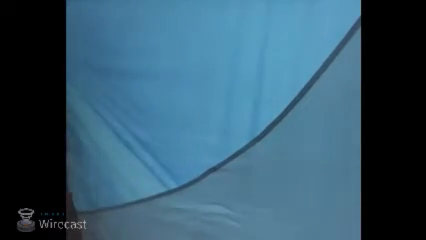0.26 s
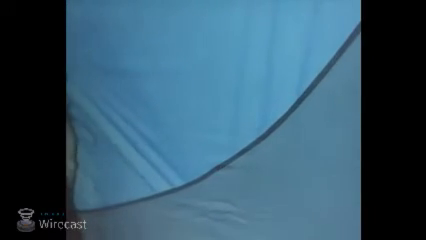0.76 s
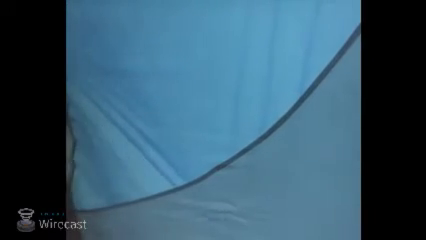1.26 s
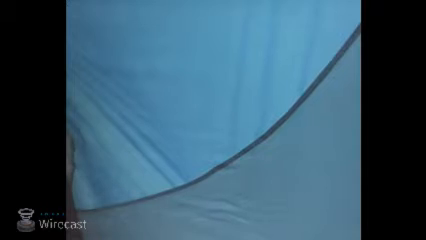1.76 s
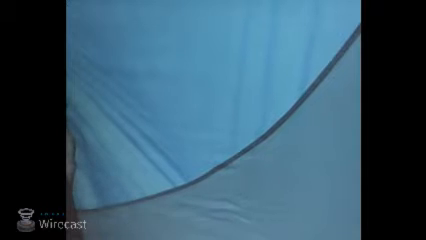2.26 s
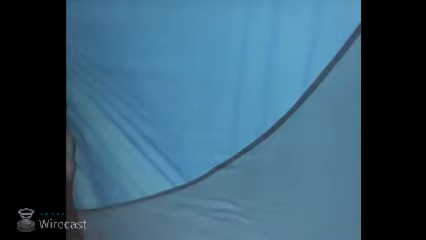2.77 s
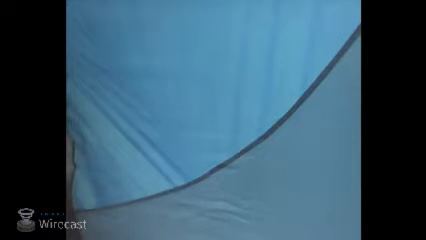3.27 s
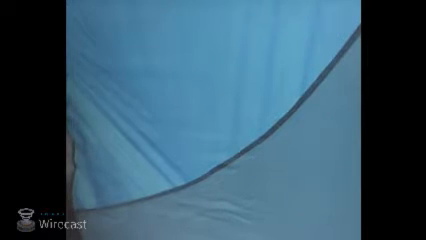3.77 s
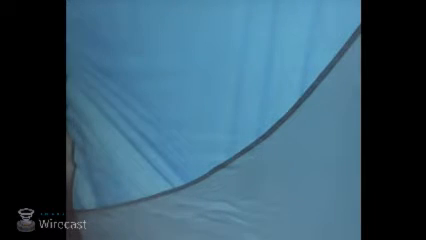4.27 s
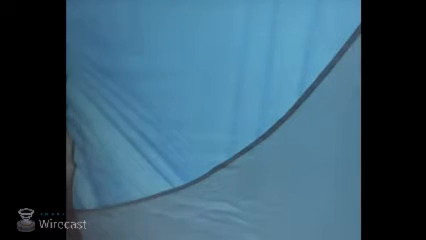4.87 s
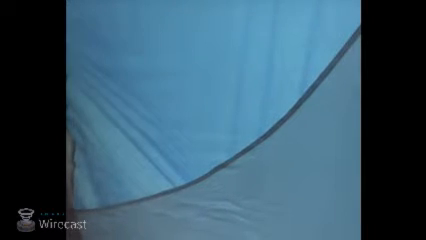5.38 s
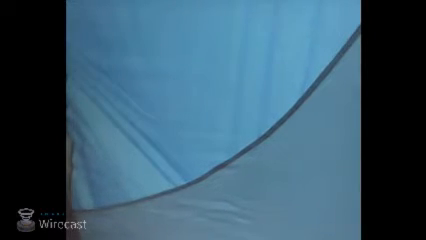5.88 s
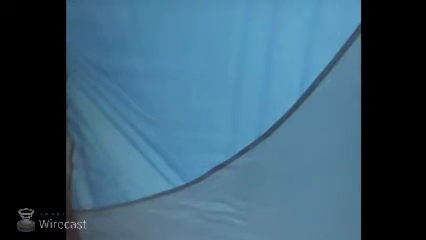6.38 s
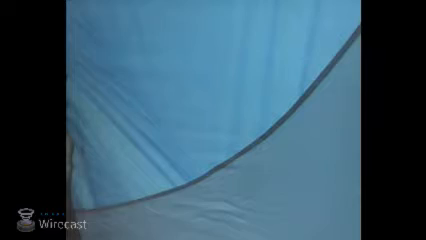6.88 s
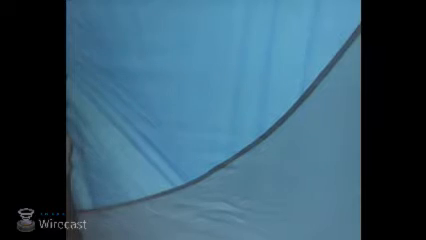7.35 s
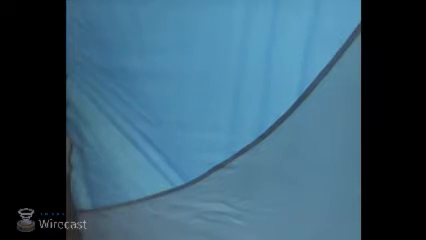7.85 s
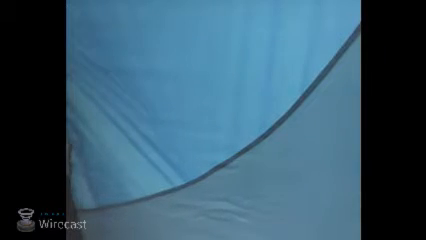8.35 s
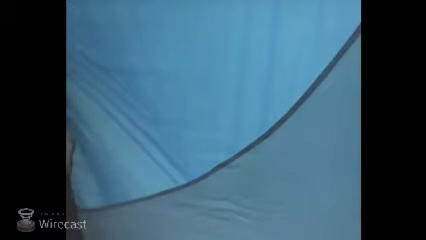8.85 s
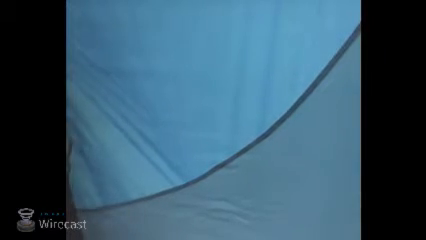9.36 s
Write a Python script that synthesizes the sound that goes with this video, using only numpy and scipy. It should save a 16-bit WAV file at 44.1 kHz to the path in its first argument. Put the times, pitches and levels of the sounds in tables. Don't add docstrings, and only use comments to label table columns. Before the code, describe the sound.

A steady far insect chorus is joined by one close, rapidly throbbing cicada, while cloth rustles and fingers tick and knock near the microphone.

```python
import sys
import numpy as np
from scipy import signal
from scipy.fft import rfft, irfft, next_fast_len
from scipy.io import wavfile
from scipy.ndimage import uniform_filter1d

SR = 44100
rng = np.random.default_rng(int(sys.argv[2]) if len(sys.argv) > 2 else 0)


def transcribe(signal):
    frames = np.atleast_2d(signal).T
    limited = np.clip(frames, -1, 1)
    pcm = np.round(limited * 32767).astype(np.int16)
    wavfile.write(sys.argv[1], SR, pcm)


def to_linear_factor(level_db):
    exponent = np.asarray(level_db, float) / 20
    return 10 ** exponent


N = 424241
TIME = np.arange(N) / SR

# t/s, clicks per s, slack note f/Hz, lowest rib f/Hz, highest rib f/Hz
WIND_UP = [(.8, 340, 5300, 10300, 10700), (1.6, 345, 5550, 10900, 11400), (2.3, 352, 5800, 11600, 12500),
           (3.4, 359, 5830, 11500, 12600), (4.1, 364, 5850, 11600, 12900), (4.35, 367, 5860, 11900, 13600),
           (4.8, 375, 5880, 13000, 13900), (5.4, 381, 5950, 13100, 14250), (6.5, 386, 6000, 13300, 14800),
           (8.0, 391, 6000, 13500, 15200), (9.7, 394, 6000, 13400, 15400)]
# t/s, slack note level/dB, its octave level/dB, taut note level below the ribs/dB
EFFORT = [
    (.6, -63, -68, -9),
    (1.5, -77, -66, -11),
    (2.3, -51, -59.5, -34),
    (3.9, -46, -54.5, -16),
    (5.3, -43.5, -51.5, -7),
    (6.5, -43.5, -50, -6.5),
    (8.0, -42.5, -51, -8),
    (9.7, -42, -53, -7),
]


def soloist():
    per_s, slack_hz, low_rib_hz, high_rib_hz = curves(WIND_UP)
    slack_db, octave_db, taut_db = curves(EFFORT)
    high_db, depth_db, slump = belly_pumps()
    swing = np.clip(depth_db / 14.2, .1, 1) * slump
    spread_hz = high_rib_hz - low_rib_hz
    ribs_hz = [low_rib_hz + k * spread_hz + 420 * swing for k in (0, .5, 1)]
    drum = buckles(per_s, weak_db=-4, rough=.8, burst_s=.003)
    fade = np.clip((TIME - .9) / 1.05, 0, 1)

    slack = evened(resonate(drum, slack_hz, 340)) * to_linear_factor(slack_db - 3.7 * swing - 6.5)

    octave = resonate(drum, 1.837 * slack_hz, 1400) - resonate(drum, 2.03 * slack_hz, 1300)
    octave = evened(octave) * to_linear_factor(octave_db - 0.7 * swing)

    taut = evened(resonate(drum, .51 * ribs_hz[2], 900)) * to_linear_factor(8.0 * swing)
    taut *= to_linear_factor(high_db + taut_db - 2.0) * fade

    rib_tilt_db = -0.5
    ribs = sum((-to_linear_factor(rib_tilt_db)) ** k * resonate(drum, hz, 900) for k, hz in enumerate(ribs_hz))
    ribs /= np.sqrt(uniform_filter1d(ribs ** 2, size=SR // 4))
    high = ribs * to_linear_factor(high_db + 1.5 + 0.84 * depth_db * slump) * fade

    air_sac = evened(resonate(drum, .155 * low_rib_hz, 110)) * to_linear_factor(slack_db - 39.5)
    song = slack + octave + taut + high + air_sac
    return np.std(song) * trees(song, t60=0.053, wet_db=-4)


# t/s, pumps ahead of the steady rate
LEAD = [(2.1, -1.27), (2.41, -.95), (2.73, -.36), (3.25, .1), (4.0, -.53), (4.62, -.3), (4.95, -.12),
        (5.28, .15), (5.5, .24), (5.68, .54), (5.9, .63), (6.08, .92), (6.5, 1.1), (6.88, 1.11),
        (7.37, 1.3), (8.45, .81), (8.8, .74), (9.62, .15)]
# t/s, taut ribs level/dB, dip between pumps/dB
RIBS = [
    (1.9, -60, 0.5),
    (2.4, -51, 16),
    (3.3, -54.5, 9.5),
    (4.2, -47.5, 14),
    (5.0, -45, 9),
    (6.2, -43.5, 6),
    (7.6, -41.5, 7),
    (9.62, -41.5, 6),
]
# middle t/s, length/s, share of the dip lost
FALTERS = [(2.2, .2, .6), (2.603, 0.16, 0.46), (3.027, .2, 0.47), (3.358, 0.16, 0.28), (4.1, 0.23, 0.58),
           (4.69, 0.35, .7), (5.137, 0.22, .5), (5.563, .22, 0.92), (5.957, 0.29, 0.88), (6.32, 0.18, .4),
           (6.8, 0.36, .75), (7.24, 0.32, .6), (7.937, .3, .55), (8.573, 0.36, .7), (9.14, .25, .55)]


def belly_pumps():
    pumps_per_s = 17
    ribs_db, dip_db = curves(RIBS)
    falter = np.clip(swells(*np.transpose(FALTERS)), 0, 1)
    high_db = ribs_db - 3.5 * falter + .6 * drift(pumps_per_s)
    depth_db = dip_db * (1 - falter)
    pump = pumps_per_s * TIME + curves(LEAD)[0]
    beat = 2 * np.pi * (pump - .04)
    beat = beat + 0.38 * (1 - np.cos(beat))
    slump = np.tanh(1.35 * np.cos(beat)) / np.tanh(1.2) - 1
    return high_db, depth_db, slump


# t/s, level/dB
CHORUS = [
    (0.0, -46.5),
    (1.1, -46.5),
    (2.3, -45.5),
    (2.6, -44.5),
    (4.9, -45),
    (5.7, -44.5),
    (7.2, -43.5),
    (9.62, -45),
]
# f/Hz, level/dB per Hz
SHRILL = [(2500, -42.5), (3600, -23.5), (4050, -11), (4500, -2.5), (4900, 1), (5600, 1), (6200, -1),
          (7000, -9), (8200, -13), (9300, -16.5), (10500, -12), (11500, -11.5), (12800, -12.5),
          (15900, -12.5)]
# t/s, rise over the chorus/dB
THROBS = [(.85, 0.5), (1.55, 0.5), (2.12, 0.4), (2.44, 0), (3.1, 0.2), (3.62, 0.5), (4.15, 0), (4.77, 1),
          (5.04, 0), (5.27, 2), (5.77, 1), (6.26, 0.5), (6.82, 0.5), (7.35, 0), (7.9, 1.5), (8.42, 1),
          (8.97, 1), (9.53, 1)]
# f/Hz, level/dB per Hz
CALLER = [(4000, -30), (4900, 1), (5600, -1), (6200, -3.5), (8000, -44), (9900, -19), (10600, -8),
          (11600, -9.5), (12800, -30)]


def chorus(count=7):
    near = np.zeros(N)
    for u, v, w, p in rng.random((count, 4)):
        wander = np.sin(2 * np.pi * (.4 * TIME + u))
        swell_db = 7.0 * np.sin(2 * np.pi * ((4 + 12 * w) * TIME + p + 0.55 * wander))
        per_s = (160 + 230 * v) * (1 + .03 * wander)
        near += buckles(per_s, weak_db=-3.5, rough=0.91, burst_s=0.0014) * to_linear_factor(swell_db)
    mass = 0.65 * trees(near, t60=0.096, wet_db=-4.5) + 0.69 * patchy(patch_db=0.04, size=512)
    s, rise_db = np.transpose(THROBS)
    throb = swells(s, 0.092, rise_db)
    caller = colour(near, CALLER, 4470, 7200) * to_linear_factor(-4.5) * np.sqrt(abs(throb))
    swell = to_linear_factor(0.53 * throb - 0.1 * drift(17))
    level = to_linear_factor(curves(CHORUS)[0] - 1.35)
    return level * (caller + colour(mass, SHRILL, 4526, 5470) * swell)


def buckles(per_s, weak_db, rough, burst_s):
    turns = np.cumsum(per_s * np.ones(N)) / SR + rng.random()
    snap = np.diff(np.floor(turns), prepend=0) > 0
    crackle = np.exp(-(turns % 1) / (per_s * burst_s)) * rng.standard_normal(N)
    side = np.where(turns % 2 < 1, 1, to_linear_factor(weak_db))
    return evened(side * ((1 - rough) * evened(snap - snap.mean()) + rough * evened(crackle)))


def trees(x, t60, wet_db):
    t = TIME[:SR // 8]
    tails = rng.standard_normal((3, SR // 8)) * to_linear_factor(-60 * t / t60)
    tails = tails * (t > .004)
    turns = np.cos(2 * np.pi * (3.1 * TIME + np.arange(3)[:, None] / 3))
    echoes = signal.oaconvolve(x * turns, tails, axes=1)[:, :N].sum(0)
    return evened(evened(x) + to_linear_factor(wet_db) * evened(echoes))


# middle t/s, length/s, peak level/dB
RUBS = [
    (0.0, 0.67, -61.5),
    (.47, 0.76, -67),
]
# t/s, peak level/dB, f/Hz, cycles
BUMPS = [
    (0.004, -48, 75.4, 2.3),
    (0.027, -41.5, 78.1, 1.1),
    (0.363, -54, 93, 3.6),
    (4.683, -51, 64, 4.1),
    (7.044, -51, 38, 1.6),
    (7.716, -57, 45, 2.2),
    (9.138, -55, 60, 2),
    (9.289, -54, 50.7, 2.2),
]
# t/s, peak level/dB, f/Hz, time to fall 60 dB/s
TICKS = [(0.405, -65, 1510, 0.018), (0.466, -56, 1000, 0.02), (1.479, -57, 697, 0.018),
         (2.487, -60, 926, 0.018), (3.241, -50, 1620, 0.0068), (4.998, -49, 1160, 0.012),
         (5.087, -55, 1800, 0.016), (5.17, -60, 1220, 0.018), (5.398, -59, 1030, 0.018),
         (7.298, -51, 1640, 0.02), (7.628, -42, 850, 0.015), (9.166, -56, 724, 0.025)]
# f/Hz, level/dB, time to fall 60 dB/s
KNOCK = [
    (394, -42, 0.049),
    (720, -44, 0.13),
    (850, -45, 0.039),
]


def handling():
    out = evened(resonate(rng.standard_normal(N), 560, 870)) * bursts(RUBS, -100)
    t = TIME[:SR // 8]
    for s, db, hz, cycles in BUMPS:
        push = np.sin(np.pi * np.minimum(t * hz / cycles, 1) ** .6)
        add(out, s, -to_linear_factor(db + 1.5) * np.sin(2 * np.pi * hz * t) * push)
    for s, db, hz, t60 in TICKS:
        scrape = 1.7 * rng.standard_normal(len(t)) * to_linear_factor(-60 * t / .012)
        add(out, s, to_linear_factor(db - 60 * t / t60) * (np.sin(2 * np.pi * hz * t) + scrape))
    knock_s = 7.627
    for hz, db, t60 in KNOCK:
        ring = to_linear_factor(db - 60 * t / t60) * np.sin(2 * np.pi * hz * t)
        add(out, knock_s, ring * to_linear_factor(-9))
        add(out, knock_s + .012, ring * to_linear_factor(1.0 - hz / 120))
    return out


# f/Hz, level/dB per Hz
CLOTH = [(88, -7), (150, -8.5), (449, -3.5), (596, -8), (655, -7.5), (1010, -8.5), (1250, -5.5), (2900, -9),
         (3800, -5), (4940, -51), (8360, -120)]
# middle t/s, length/s, peak level/dB
DRAGS = [(0.0, .45, -66), (.46, 0.51, -71.5), (.99, 0.57, -62.5), (1.29, .15, -70.5), (2.5, 0.089, -71.5),
         (2.99, .35, -71.5), (3.37, 0.62, -70.5), (3.78, 0.13, -70.5), (5.01, 0.07, -80), (5.1, 0.081, -74),
         (5.41, 0.075, -70.5), (7.12, 0.29, -72.5), (7.28, 0.61, -66.5), (7.58, 0.28, -62.5),
         (7.85, 0.97, -73), (8.83, 0.42, -69.5), (9.15, 0.24, -74)]


def cloth():
    size_db = 2.4 * np.minimum(rng.exponential(1, N), 4)
    slips = rng.standard_normal(N) * to_linear_factor(size_db) * (rng.random(N) < .3)
    top_db = CLOTH[-2][1]
    wide = CLOTH[:-1] + [(6000, top_db - 4), (9000, top_db - 3), (13000, top_db - 8)]
    drags = bursts(DRAGS, -79.5 + 1.87 * drift(8.7))
    return colour(slips, wide, 630, 1460) * drags * to_linear_factor(1.4 * drift(30))


# t/s, f/Hz, level/dB
BIRD = [
    (4.75, 1200, -74),
    (4.79, 1340, -69),
    (4.83, 1410, -82),
    (4.86, 1300, -69),
    (4.91, 1160, -74),
]


def bird():
    hz, db = curves(BIRD)
    on = (TIME > BIRD[0][0]) & (TIME < BIRD[-1][0])
    return to_linear_factor(db) * np.sin(2 * np.pi * np.cumsum(hz) / SR) * uniform_filter1d(on * 1., size=400)


# f/Hz, level/dB per Hz
AIR = [(12, -31), (20, -1), (65, 3), (176, -0.5), (283, -5), (344, -12), (477, -14), (593, -18.5),
       (936, -19), (1540, -20.5), (2380, -8), (3030, -11.5), (3600, -17), (4680, -107), (7920, -120)]
# middle t/s, length/s, peak level/dB
GUSTS = [
    (0.0, 0.48, -52),
    (.39, .12, -55),
    (.91, 0.22, -68),
    (4.705, 0.11, -52),
    (6.35, .25, -59),
    (7.06, .14, -57),
    (9.16, .1, -47),
    (9.62, .25, -57),
]
# t/s, level/dB
TRAFFIC = [
    (0.0, -57),
    (.5, -60.5),
    (1.2, -77),
    (1.85, -70),
    (2.1, -57.5),
    (4.0, -60),
    (5.3, -58.5),
    (8.3, -64),
    (9.0, -76),
    (9.62, -66),
]


def air():
    gusts = bursts(GUSTS, -67 + 2 * drift(4.6))
    floor = colour(patchy(patch_db=1.83, size=1024), AIR + [(4200, -90)], 400, 3220) * to_linear_factor(-68)
    wind = evened(resonate(rng.standard_normal(N), 45.3, 77)) * gusts * to_linear_factor(-3.0)
    traffic_db = curves(TRAFFIC)[0] - 8.0 + 2.0 * drift(6)
    traffic = evened(resonate(rng.standard_normal(N), 184, 150)) * to_linear_factor(traffic_db)
    return floor + wind + traffic


def patchy(patch_db, size):
    a, b, patches = rng.standard_normal((N // (size // 4) + 5, size // 2 + 1, 3)).T
    patches = uniform_filter1d(patches, size=9, axis=0)
    patches = evened(uniform_filter1d(patches, size=16, axis=1))
    grains = (a + 1j * b) * to_linear_factor(patch_db * patches)
    return evened(signal.istft(grains, nperseg=size, noverlap=size * 3 // 4)[1][:N])


def resonate(x, hz, width):
    turn = np.exp(2j * np.pi * np.cumsum(hz * np.ones(N)) / SR)
    r = np.exp(-np.pi * width / SR)
    smooth = signal.lfilter([(1 - r) ** 2], [1, -2 * r, r * r], x * turn.conj())
    return 2 * (turn * smooth).real


def colour(x, points, lo_hz, hi_hz):
    size = next_fast_len(N, True)
    hz = np.fft.rfftfreq(size, 1 / SR)
    f, db = np.transpose(points)
    z = rfft(x, size) * to_linear_factor(np.interp(np.log(hz + 1), np.log(f + 1), db))
    band = irfft(z * (hz > lo_hz) * (hz < hi_hz), size)
    return irfft(z, size)[:N] / np.std(band)


def swells(middle_s, length_s, height):
    t = TIME[::64]
    u = (t[:, None] - middle_s) / length_s
    humps = height * np.cos(np.pi * np.clip(u, -.5, .5)) ** 2
    return np.interp(TIME, t, humps.sum(1))


def bursts(rows, rest_db):
    s, length_s, db = np.transpose(rows)
    return np.sqrt(to_linear_factor(rest_db) ** 2 + swells(s, length_s, to_linear_factor(db) ** 2))


def drift(per_s):
    steps = rng.standard_normal(int(N / SR * per_s) + 2)
    return evened(np.interp(TIME * per_s, np.arange(len(steps)), steps))


def curves(rows):
    s, *columns = np.transpose(rows)
    return [np.interp(TIME, s, c) for c in columns]


def add(mix, s, sound):
    part = mix[round(s * SR):][:len(sound)]
    part += sound[:len(part)]


def evened(x):
    return x / np.sqrt(np.mean(x ** 2) + 1e-20)


def scene():
    mono = soloist() + chorus() + handling() + cloth() + bird() + air()
    return np.tile(mono, (2, 1))


def low_pass(x):
    return signal.sosfilt(signal.butter(12, 16390, fs=SR, output="sos"), x)


def record(dry):
    edge = signal.firwin(3071, 15750, window=("kaiser", 9), fs=SR)
    mix = signal.oaconvolve(dry, edge[None], "same")
    return low_pass(mix)


dry = scene()
out = record(dry)
transcribe(out)
```